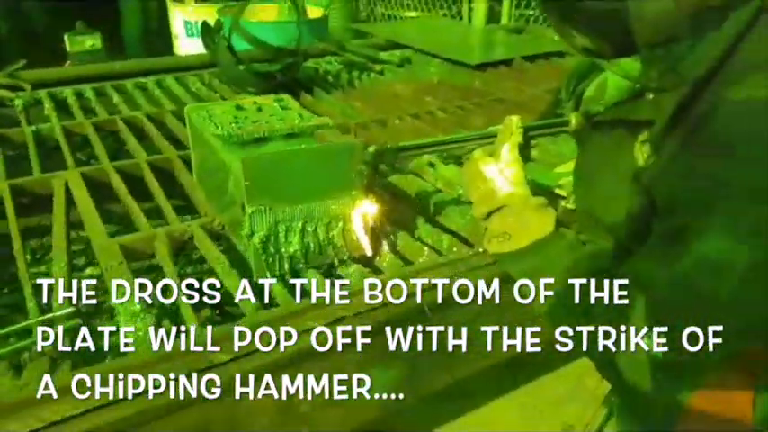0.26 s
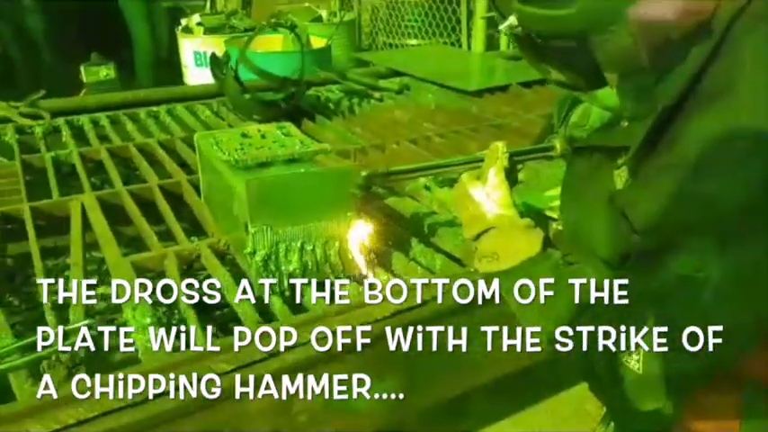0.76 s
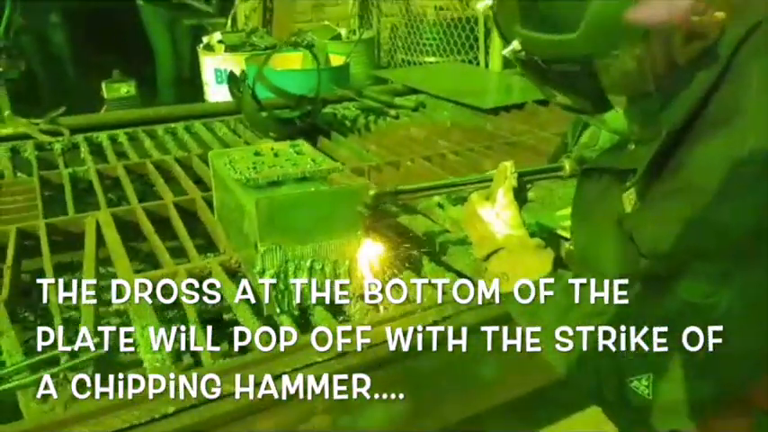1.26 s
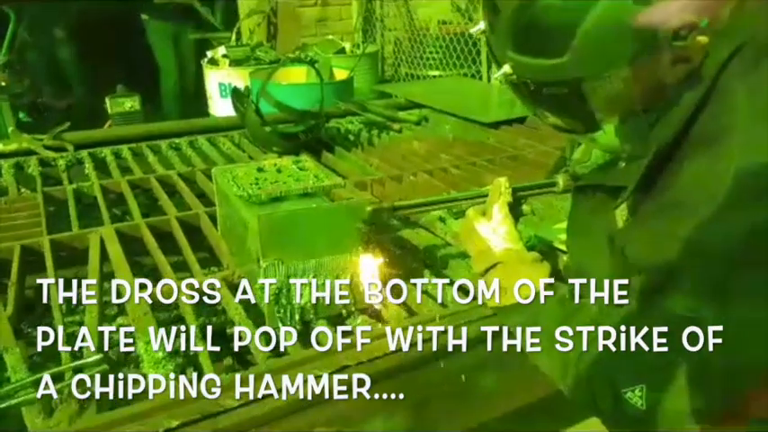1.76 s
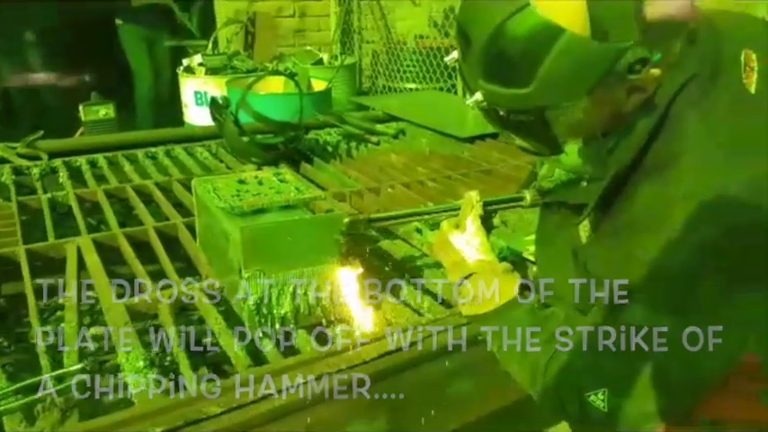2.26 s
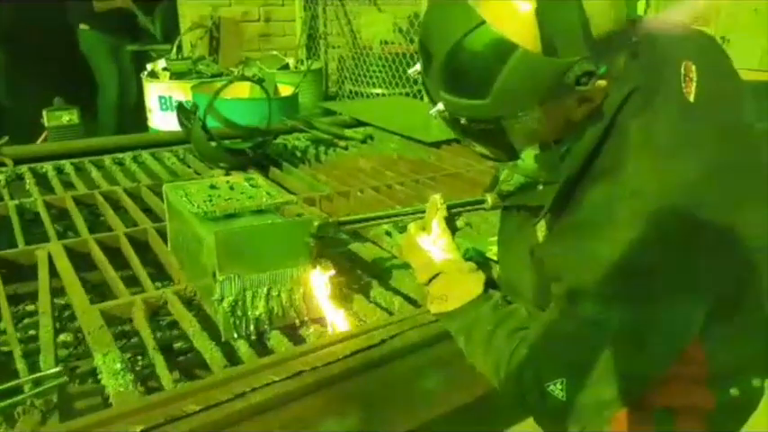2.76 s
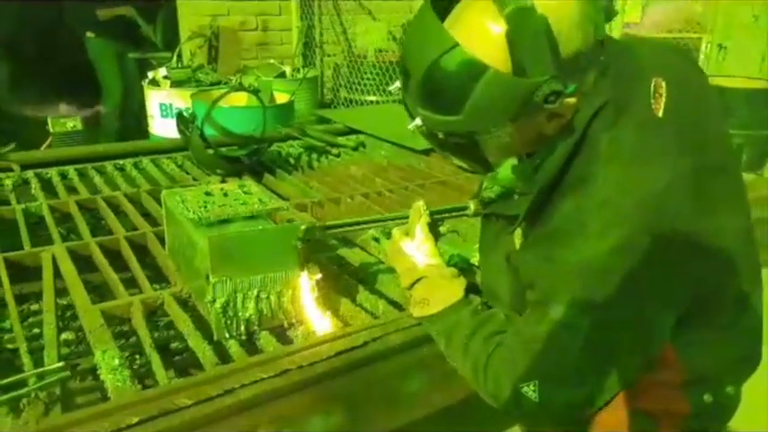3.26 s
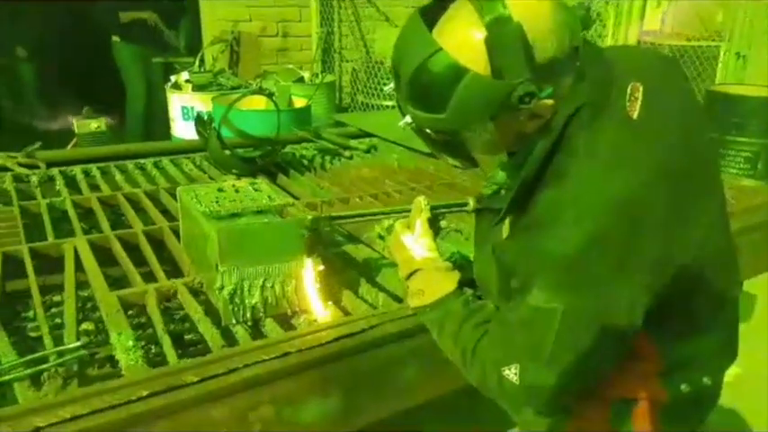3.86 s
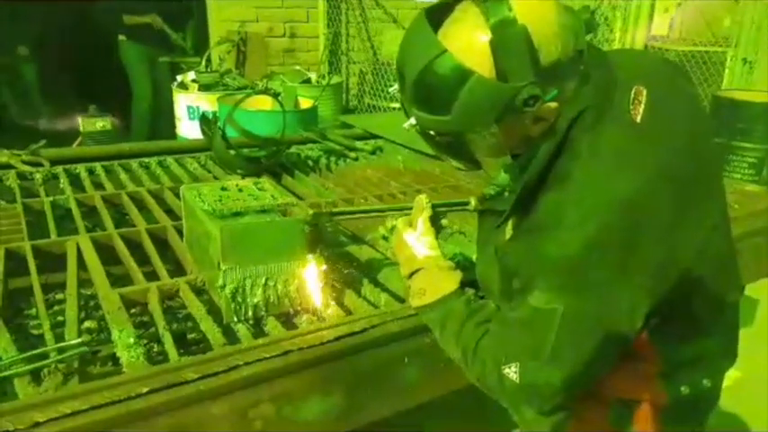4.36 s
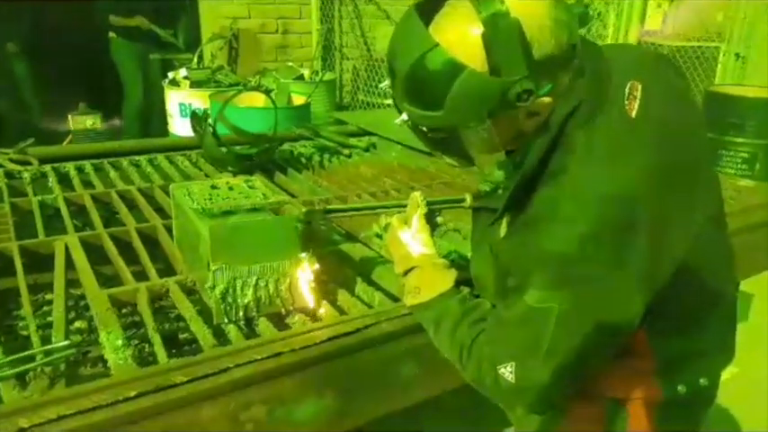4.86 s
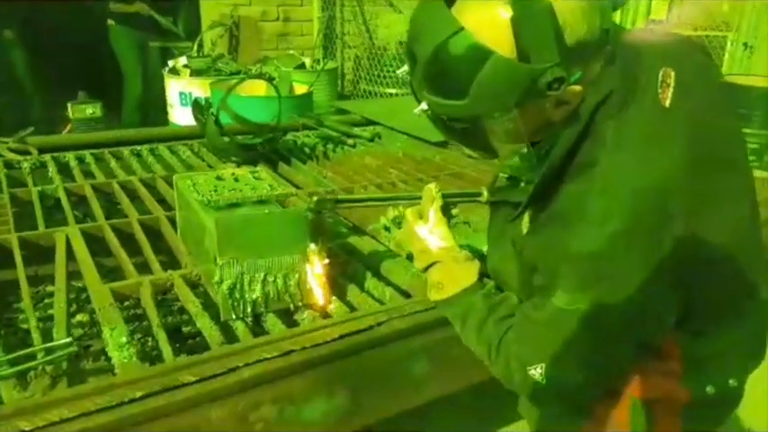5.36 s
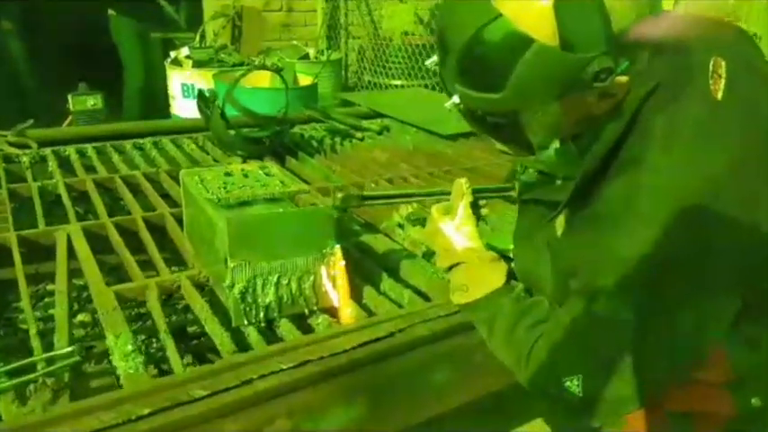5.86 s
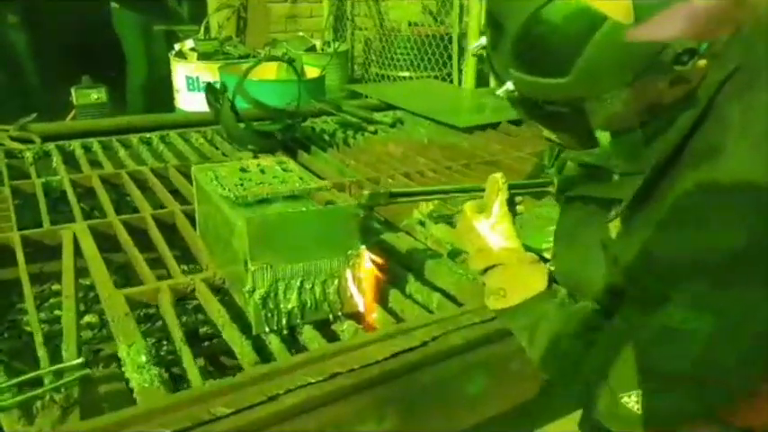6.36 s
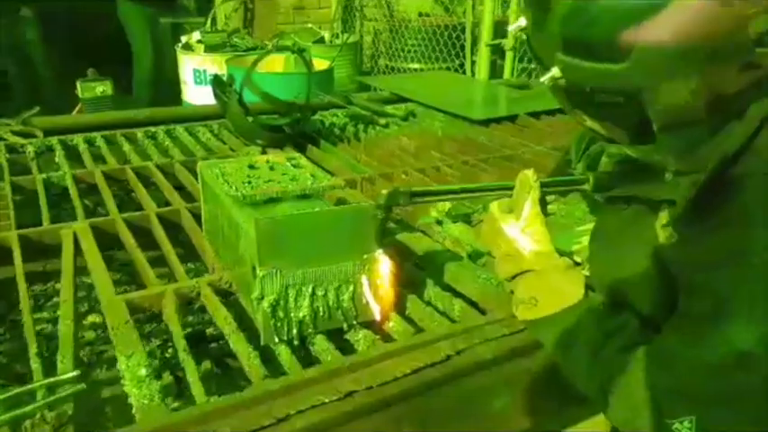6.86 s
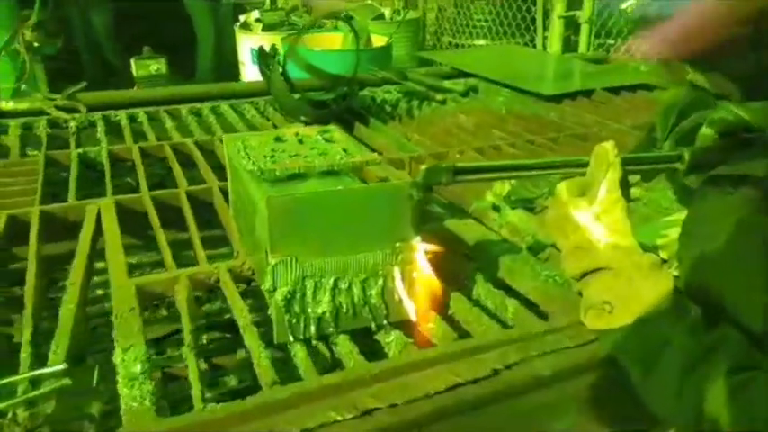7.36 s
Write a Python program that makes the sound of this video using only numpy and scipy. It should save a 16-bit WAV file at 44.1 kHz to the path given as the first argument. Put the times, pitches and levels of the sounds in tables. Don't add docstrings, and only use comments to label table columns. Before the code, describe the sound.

A steady but restless jet of gas cuts thick steel nearby, broadband and sizzling, with low flame rumble beneath and faint metallic ringing. The treble dulls and the jet dies shortly after five seconds. A grinder farther back then emerges, its gritty rasp and high singing steel peaking near seven seconds over deepening shop rumble. Wide stereo, hard reflective workshop, no speech.

```python
import sys
import numpy as np
from scipy import signal
from scipy.fft import rfft, irfft, next_fast_len
from scipy.io import wavfile
from scipy.ndimage import uniform_filter1d, map_coordinates

SR = 44100
rng = np.random.default_rng(int(sys.argv[2]) if len(sys.argv) > 2 else 0)


def dump(signal):
    limited = np.clip(np.atleast_2d(signal).T, -1, 1)
    pcm = np.round(limited * 32767).astype(np.int16)
    wavfile.write(sys.argv[1], SR, pcm)


def elevation(decibels):
    levels = np.asarray(decibels, float)
    return 10 ** (levels / 20)


N = 336042
CUT_S = 5.155

# start_s [s], strength_db [dB], kerf_openness_db [dB]
JET = [(0.0, -28, 3), (0.76, -25, -4.5), (0.86, -28.5, -0.5), (1.34, -25.5, -3.5), (1.47, -29, 0),
       (1.7, -27.5, -5), (1.83, -30.5, 2), (2.5, -21.5, -6.5), (2.66, -25, -1), (2.94, -24, 1),
       (3.17, -22, -7), (3.64, -22.5, -5.5), (4.09, -26, -2.5), (4.11, -29.5, -2.5), (4.5, -28.5, 0.5),
       (4.81, -32, 0), (5.02, -29.5, -2.5), (5.13, -29, -4.5)]
# frequency_hz [Hz], density_db [dB per Hz]
ROAR = [(700, -40), (1000, -2.5), (2000, 0.5), (4000, -3), (6500, -1.5), (7200, 1), (9000, -1), (11000, -1),
        (13500, 0), (15200, 1)]
# centre_hz [Hz], width_hz [Hz], left_db [dB], right_db [dB]
EARLY = [(1070, 160, -10, -0.5), (1444, 230, -3, 9), (1980, 41, -13, -8.5), (1650, 43, -5, -5.5),
         (2750, 200, 1, 10.5), (3300, 130, -0.5, 4), (3670, 64, -9, -4), (3880, 340, 5.5, 6),
         (4520, 120, -8, -4), (7200, 220, 3.5, -4), (7320, 350, -3.5, -11), (8840, 330, 7, 3.5),
         (8650, 150, 4.5, 4), (14100, 200, 6, 0), (5400, 580, 2, -1), (10000, 250, 4.5, -3),
         (15000, 350, 0, 2.5)]
MIDDLE = [(1060, 150, -4.5, 0), (1436, 163, -1, 9), (2140, 85, 0.5, -12), (1710, 94, -4, -5),
          (2560, 40, -1, -13), (2416, 73, 5, 9.5), (2756, 183, 8, 7.5), (3230, 96, 1.5, 9.5),
          (3600, 120, 1.5, 0), (4200, 140, -5, 7), (4800, 220, 6, -1.5), (5540, 120, 2, -1.5),
          (7500, 360, -2.5, -7), (8640, 490, 6, 1.5), (9660, 380, -3.5, -3.5), (12400, 1400, 1, -1)]
LATE = [(1030, 110, -14, -2), (1397, 135, -14, 5.5), (2380, 140, 1.5, 3.5), (2060, 49, -8, -4),
        (4640, 160, -3, -5), (2790, 180, 2.5, 9), (3520, 100, -3, 2.5), (4130, 160, 2, 6.5),
        (5460, 440, 8, 3.5), (5740, 105, -13, -12), (7350, 130, -6, -3), (7440, 180, -1, -16),
        (8830, 260, 5.5, 1), (12900, 1800, 2.5, -3)]
MOVES = [
    2.21,
    3.97,
]


def torch():
    hz, t = frames(size=1024)
    strength_db, open_db = curves(JET, t, before_db=None, after_db=None)
    roar_db = strength_db - 260 * np.clip(t - CUT_S, 0, 1)
    dull_db = 4.5 * np.clip((t - CUT_S) / 0.072 + 1, 0, 1)
    flutter = 0.38 * wobble(12, t) + 0.27 * wobble(30.07, t)

    hiss_db = -0.5 + 0.25 * open_db - dull_db + 0.19 * flutter + 0.26 * wobble(12, t)
    fizz_db = 1.5 + open_db - dull_db + 0.43 * flutter + 1.1 * wobble(30.02, t)
    level_db = roar_db + flutter + hiss_db * above(hz, edge_hz=6850)
    level_db = level_db + (fizz_db - hiss_db) * above(hz, edge_hz=10500)

    lean, shade = (np.clip((t - s) / 0.37 + .5, 0, 1) for s in MOVES)
    near_db = (1 - lean) * reflected(EARLY, hz)
    near_db = near_db + lean * (1 - shade) * reflected(MIDDLE, hz)
    near_db = near_db + shade * reflected(LATE, hz)
    crackle = elevation(0.38 * wobble(300, np.arange(N) / SR))
    return crackle * rush(ROAR, level_db + near_db, patchy_db=1.01, echo=0.6, size=1024)


# start_s [s], level_db [dB]
GRIND = [(5.1, -42), (5.22, -37), (5.64, -35.5), (5.78, -32), (6.06, -29.3), (6.34, -28.5), (6.8, -24.5),
         (7.04, -25), (7.32, -30.5), (7.62, -30)]
# frequency_hz [Hz], density_db [dB per Hz]
RASP = [(750, -45), (1000, 1), (2000, 0), (3500, -5.5), (5000, -5), (6800, -6), (9500, -7), (12000, -5),
        (15000, -3.5)]
# centre_hz [Hz], width_hz [Hz], left_db [dB], right_db [dB]
FAR = [(1050, 120, -9, 0.5), (1260, 207, 0, 7), (1790, 75, 4, 6), (2660, 245, -1, 9), (3640, 120, -7, -4),
       (5560, 150, -4, -2), (4100, 220, 2, 9.5), (5950, 200, 6.5, -0.5), (7500, 320, 0.5, -12),
       (8930, 210, 10, 5), (10500, 460, -1, -3.5), (15600, 80, 4, 4), (3340, 97, 6, 6), (9040, 150, -6, -5),
       (12000, 270, 6, -1), (13000, 970, 0, -2.5)]


def grinder():
    hz, t = frames(size=2048)
    rasp_db, = curves(GRIND, t, before_db=-44, after_db=None)
    bright_db = 1.0 + 2 * (t > 6.85) + 0.84 * wobble(9, t)
    level_db = rasp_db - 6.5 + bright_db * above(hz, edge_hz=7000)
    level_db = level_db + 1.4 * wobble(13, t) * above(hz, edge_hz=10600)
    many_modes = np.clip(field((len(hz), len(t)), bins=1, frames=22) - .6, 0, 3)
    small_db = 1.9 * many_modes * above(hz, edge_hz=3100)
    return rush(RASP, level_db + small_db + reflected(FAR, hz), patchy_db=1.2, echo=0.66, size=2048)


# loudest_s [s], half_length_s [s], pitch_hz [Hz], level_db [dB]
SING = [(1.45, .3, 1829, -41), (2.7, .4, 1829, -39), (2.94, .08, 4194, -32), (3.2, .09, 4194, -31),
        (5.34, .17, 1829, -47), (5.4, .2, 6176, -51), (5.5, .2, 11095, -50), (5.6, .3, 4197, -53),
        (5.6, .4, 6056, -52), (5.75, .15, 1829, -45), (5.8, .15, 6176, -45), (5.95, .3, 2789, -45),
        (6.05, .12, 6085, -40), (6.15, .3, 4040, -49), (6.25, .3, 11694, -43), (6.27, .15, 6028, -42),
        (6.3, .3, 3026, -46), (6.35, .4, 8694, -37), (6.36, .2, 6056, -32), (6.4, .7, 8927, -46),
        (6.45, .3, 1829, -41), (6.8, .25, 5152, -34), (6.78, .2, 4198, -35), (7.05, .3, 4168, -36),
        (7.2, .3, 11095, -31), (7.2, .4, 4828, -47), (7.35, .28, 4198, -36), (7.45, .2, 5140, -45),
        (7.5, .35, 4769, -39)]
# pitch_hz [Hz], level_db [dB]
CHORUS = [(4287, -42), (4318, -44), (4497, -43), (5577, -45), (6176, -36), (7227, -48), (8400, -45),
          (9615, -45), (10255, -43), (11307, -43), (11995, -43), (12055, -48), (12174, -47), (14663, -43)]


def singing_steel():
    out = np.zeros((2, N))
    t = np.arange(N) / SR
    wheel_hz = 29
    throb = 1 + .25 * np.sin(2 * np.pi * wheel_hz * t + 2.5 * wobble(6, t))
    chorus = [(6.93 + .06 * rng.standard_normal(), .33, hz, db) for hz, db in CHORUS]
    for s, half, hz, db in SING + chorus:
        near = slice(round(max(s - 2 * half, 0) * SR), round((s + 2 * half) * SR))
        now = t[near]
        age = now - s + 2 * half

        width_hz = 8.94 * 2 ** ((-35 - db) / 13.5)
        knots, grid = rng.standard_normal((4, 200)), np.arange(200)
        rates = [width_hz, width_hz, 70, 70]
        size, drift, *skirt = (np.interp(age * rate % 199, grid, k) for k, rate in zip(knots, rates))
        own = (1 + 0.36 * size) * np.exp(1.2j * drift) + 0.43 * (skirt[0] + 1j * skirt[1])

        ports_db = reflected(FAR, np.array([hz]))[:, 0]
        sideways_db = 1.72 * (ports_db - ports_db.mean())
        swell = elevation(db - 3 - 11.5 * ((now - s) / half) ** 2 + sideways_db)
        lag = np.array([[0], [1.3 * (hz > 7000)]])
        line = np.real(1.57 * own * np.exp(1j * (2 * np.pi * hz * now + lag)))
        out[:, near] += swell * throb[near] * line
    return out


# start_s [s], level_db [dB]
SHOP = [(0, -41), (.75, -39), (1.5, -40.5), (2.02, -41), (2.25, -37.5), (3.8, -36.5), (4.08, -41),
        (4.16, -44), (4.8, -47), (5.3, -45), (5.55, -41.5), (5.95, -34), (7.62, -32)]
# frequency_hz [Hz], density_db [dB per Hz]
RUMBLE = [(12, -48), (20, -18.5), (92, -2.5), (129, 0.5), (260, 0), (297, -4.5), (342, -3), (411, -8),
          (450, -2.5), (580, -24), (990, -120)]
BOOM = [(240, -20), (400, -14.5), (585, -0.5), (740, -7.5), (843, -8.5), (950, -13.5), (1240, -30),
        (2090, -120)]


def shop():
    t = np.arange(N) / SR
    rumble_db, = curves(SHOP, t, before_db=None, after_db=None)
    flame_db = 6 * np.clip(1 - (t - CUT_S) / 0.1, 0, 1)
    low = rush(RUMBLE, np.array([[[-1.2]], [[1.2]]]), patchy_db=0.5, echo=0.11, size=2048)
    boom = rush(BOOM, np.array([[[-.3]], [[.3]]]), patchy_db=1.07, echo=0.1, size=2048)
    return elevation(rumble_db) * (low + elevation(flame_db - 1.5) * boom)


# frequency_hz [Hz], likeness [0 to 1]
ALIKE = [(60, 0.94), (300, .97), (700, 0.97), (950, 0.54), (1300, 0.77), (2000, 0.57), (2700, 0.59),
         (4000, 0.46), (8500, 0.79), (15000, 0.3)]
# frequency_hz [Hz], lead_rad [radians]
LEAD = [(450, 0), (800, .2), (1050, 2.5), (1500, 3), (2200, 2.5), (2700, 0.23), (3300, 1), (8000, 1.23)]


def rush(spectrum, extra_db, patchy_db, echo, size):
    hz, t = frames(size)
    a, b = signal.stft(rng.standard_normal((2, N)), nperseg=size)[2]
    colour = elevation(along(spectrum, hz))
    colour = colour[:, None] / np.sqrt(np.mean(colour[hz < 7000] ** 2) * 7000 / hz[-1])

    shared = field(a.shape, bins=4, frames=60)
    echo_phases = [2.5 * (shared + 0.39 * field(a.shape, bins=4, frames=60)) for _ in range(2)]
    combs = np.array([1 - echo * np.exp(1j * phase) for phase in echo_phases])

    loose = above(hz, edge_hz=3200) - above(hz, edge_hz=7670) + above(hz, edge_hz=9300)
    lead = along(LEAD, hz)[:, None] + 1.31 * loose * field(a.shape, bins=8, frames=80)
    turn = np.arccos(np.clip(along(ALIKE, hz), -1, 1))[:, None] / 2
    left = np.cos(turn) * a + np.sin(turn) * b
    right = (np.cos(turn) * a - np.sin(turn) * b) * np.exp(1j * lead)
    patches_db = patchy_db * field(a.shape, bins=8, frames=3)
    ports = np.array([left, right]) * colour * combs * elevation(extra_db + patches_db)
    return signal.istft(ports, nperseg=size)[1][:, :N]


def reflected(bumps, hz):
    lifts = [np.outer([l, r], np.exp(-.5 * ((hz - c) / w) ** 2)) for c, w, l, r in bumps]
    return sum(lifts)[..., None]


def unit(x):
    return x / np.sqrt(np.mean(x ** 2) + 1e-20)


def along(points, hz):
    f, v = np.transpose(points)
    return np.interp(np.log(hz + 1), np.log(f + 1), v)


def curves(rows, t, before_db, after_db):
    s, level, *cols = np.transpose(rows)
    return [np.interp(t, s, level, before_db, after_db)] + [np.interp(t, s, c) for c in cols]


def wobble(rate, t):
    knots = rng.standard_normal(int(N * rate / SR) + 4)
    return map_coordinates(knots, [t * rate], mode="nearest")


def field(shape, bins, frames):
    f = rng.standard_normal(shape)
    for _ in range(2):
        f = uniform_filter1d(uniform_filter1d(f, bins, 0), frames, 1)
    return unit(f)


def frames(size):
    hop = size // 2
    return np.fft.rfftfreq(size, 1 / SR), np.arange(-(-N // hop) + 1) * hop / SR


def above(hz, edge_hz):
    return .5 + .5 * np.tanh((hz[:, None] - edge_hz) / 300)


def scene():
    return torch() + grinder() + singing_steel() + shop()


def top_cut(x):
    return signal.sosfilt(signal.butter(12, 16590, fs=SR, output="sos"), x)


def record(dry):
    m = next_fast_len(N)
    loss_db = np.clip(np.fft.rfftfreq(m, 1 / SR) - 15490, 0, 150)
    kept = irfft(rfft(dry, m) * elevation(-loss_db), m)[:, :N]
    return top_cut(kept)


dry = scene()
out = record(dry)
dump(out)
```